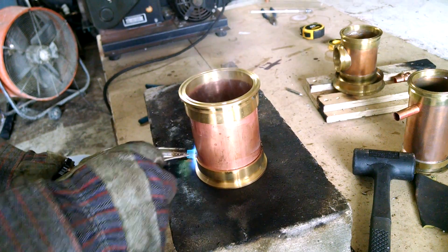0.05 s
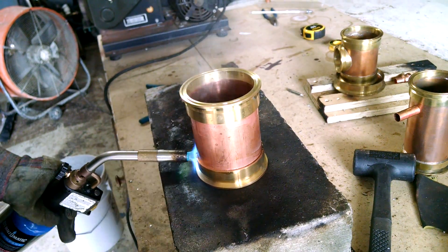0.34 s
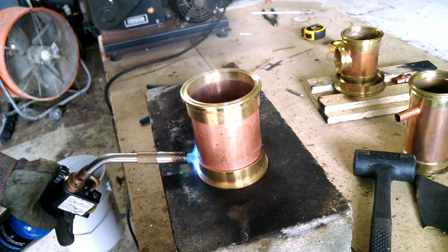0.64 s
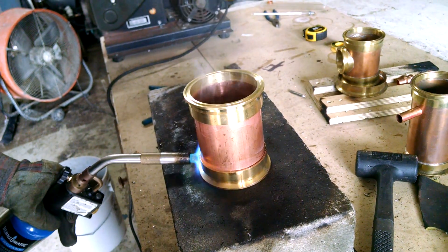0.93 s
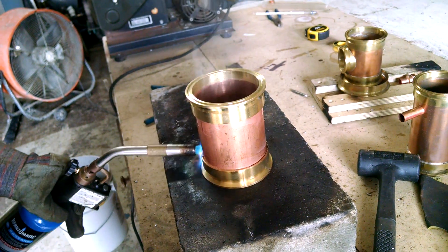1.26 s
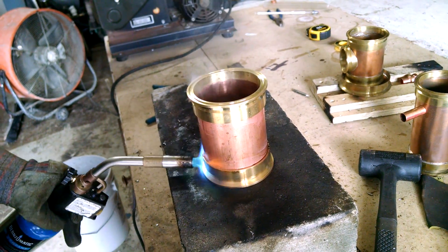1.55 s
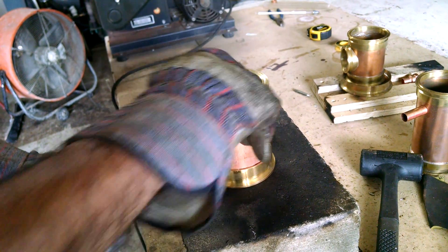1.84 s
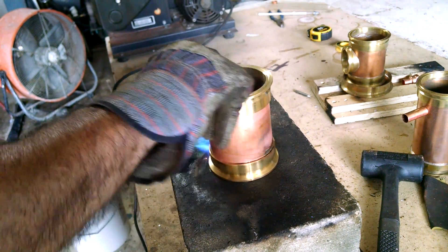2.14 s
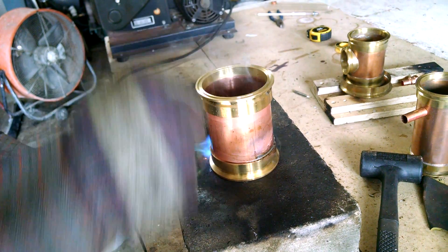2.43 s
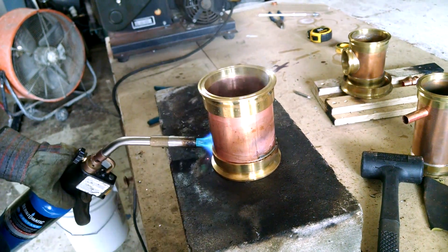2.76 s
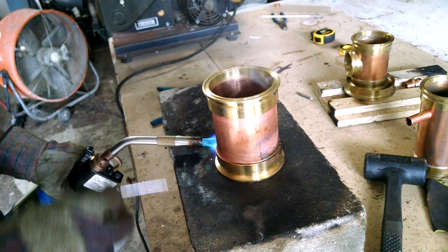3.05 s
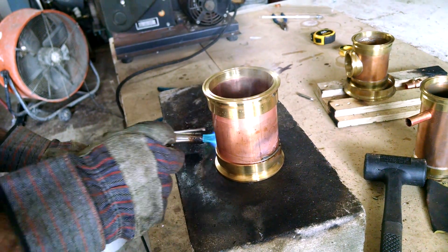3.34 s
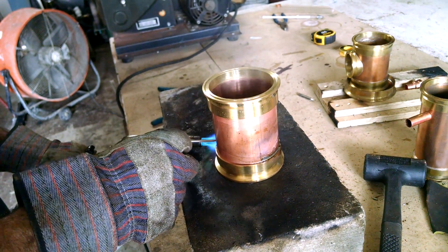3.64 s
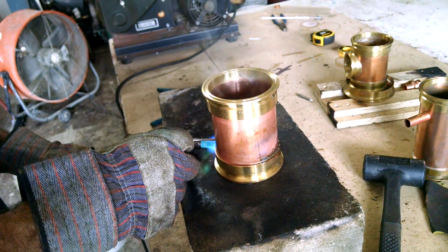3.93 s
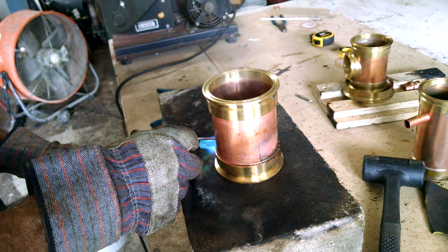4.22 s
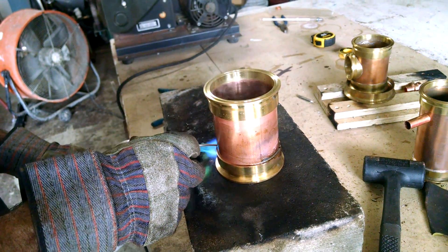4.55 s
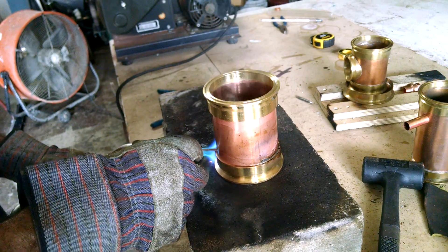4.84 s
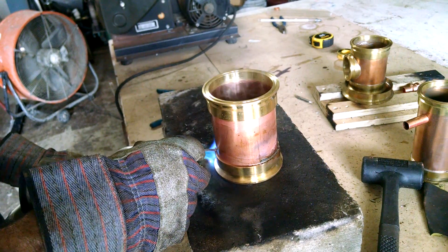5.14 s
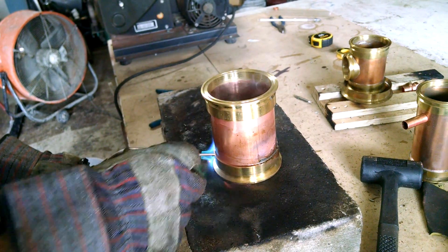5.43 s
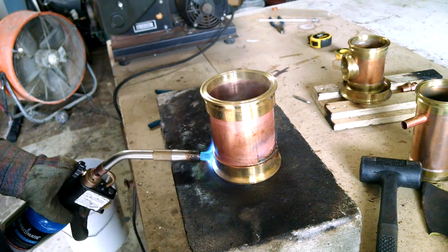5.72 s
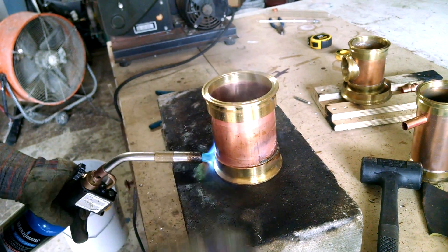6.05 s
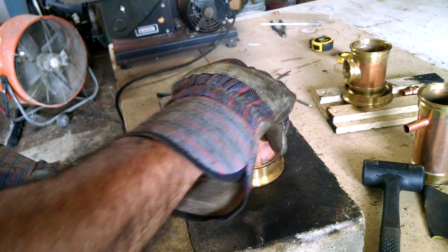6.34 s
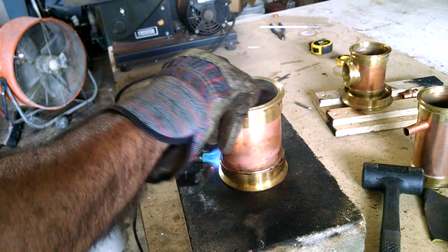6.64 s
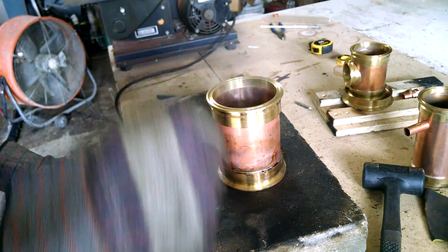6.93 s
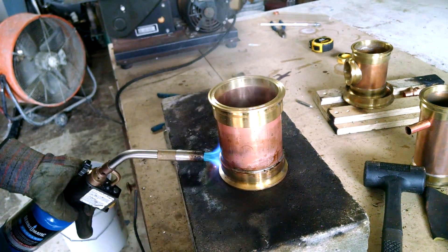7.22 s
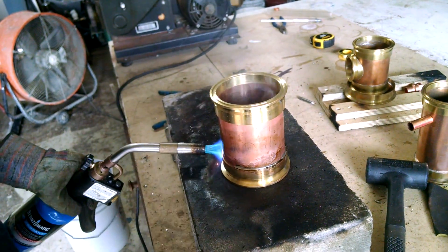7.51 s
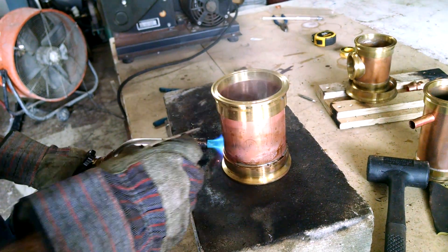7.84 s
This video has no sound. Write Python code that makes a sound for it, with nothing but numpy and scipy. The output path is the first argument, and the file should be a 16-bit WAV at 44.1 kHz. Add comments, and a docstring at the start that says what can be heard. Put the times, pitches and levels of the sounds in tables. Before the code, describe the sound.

A hand-held gas torch roars and hisses steadily against a copper pipe, close up, with a faint motor hum behind.

```python
"""Gas torch at a workshop bench

Close up, a hand-held torch burns against a copper pipe joint; a motor hums behind it, off to the right.
The turbulent flame roars and flutters, and the gas jet hisses as it is played over the metal.
A gloved hand works close by and shades it. Echoes off the bench colour the roar,
and two spaced microphone ports pick it all up."""
import sys
import numpy as np
from scipy import signal
from scipy.fft import rfft, irfft
from scipy.io import wavfile
from scipy.ndimage import uniform_filter1d

SR = 44100
rng = np.random.default_rng(int(sys.argv[2]) if len(sys.argv) > 2 else 0)


def waveform_to_disk(signal):
    """Save audio, clipped to [-1, 1], as 16-bit WAV at the path in sys.argv[1]."""
    frames = np.transpose(np.atleast_2d(signal))
    scaled = np.clip(frames, -1, 1) * 32767
    samples = np.round(scaled).astype(np.int16)
    wavfile.write(sys.argv[1], SR, samples)


N = 347508
TIME = np.arange(N) / SR
FREQ = np.arange(N // 2 + 1) * SR / N


def undb(db):
    """Decibels to gain."""
    return 10 ** (np.asarray(db) / 20)


def curve(table):
    """A table's values, joined by straight lines in time."""
    return np.interp(TIME, *np.transpose(table))


def across(table):
    """A table's columns, joined by straight lines in log frequency."""
    hz, *columns = np.transpose(table)
    return [np.interp(np.log(FREQ + 1), np.log(hz), column) for column in columns]


def bell(hz, width_hz):
    """A rounded bump of height 1 in frequency."""
    return np.exp(-(2 * (FREQ - hz) / width_hz) ** 2)


def colour(outline, peaks):
    """A spectrum in dB: a broad outline with peaks and notches on it."""
    return across(outline)[0] + sum(db * bell(hz, width) for hz, width, db in peaks)


def lift(x, hz, width_hz, db):
    """Raise or lower one band of a sound by a changing number of dB."""
    return x + (undb(db) - 1) * irfft(rfft(x) * bell(hz, width_hz), N)


def drift(rate_hz):
    """A smooth random wobble of spread 1 that moves about rate_hz times a second."""
    wobble = irfft(rfft(rng.standard_normal(N)) * np.exp(-(FREQ / rate_hz) ** 2), N)
    return wobble / wobble.std()


def steady(x, seconds, share=0.38):
    """Even out a share of the short-term swings in a noise's power."""
    power = uniform_filter1d(np.mean(x ** 2, axis=0), int(seconds * SR))
    return x * power ** (-share / 2)


# The torch as it reaches the two microphone ports. Each row: frequency in Hz, left minus right in dB,
# coherence from 0 to 1, phase by which the left leads in radians.
MIC_PORTS = [(60, -9.5, 0.8, 1.43), (130, -6.5, 0.95, 1.04), (260, 0.1, 0.98, 1.08),
             (400, 3.1, 0.83, -0.18), (540, -4.4, 0.94, 0.48), (700, 0.5, 0.98, 0.27),
             (1200, 0.8, 0.99, 0.03), (1900, -4.4, 0.87, -0.52), (2150, -3.2, 0.5, -1.35),
             (2500, -4.1, 0.97, -3.32), (2950, -0.3, 0.89, -3.96), (3300, 2.4, 0.73, -5.09),
             (3600, -1.0, 0.71, -5.7), (4200, -0.7, 0.32, -4.89), (4680, -0.3, 0.42, -3.9),
             (4950, -0.2, 0.86, -3.2), (5350, 0.6, 0.57, -3.7), (5700, 2.0, 0.41, -4.4),
             (6030, 0.4, 0.49, -5.8), (6550, -1.2, 0.66, -6.15), (6820, -1.3, 0.6, -6.4),
             (7050, -1.5, 0.1, -8.9), (7700, -1.2, 0.82, -9.9), (8600, 2.2, 0.45, -10.67),
             (9300, -2.2, 0.62, -12.8), (9700, -1.5, 0.42, -15.0), (10350, 0.4, 0.93, -15.71),
             (11000, -0.5, 0.5, -16.8), (11550, -1.1, 0.58, -18.9), (12300, -1.1, 0.48, -20.9),
             (12800, -1.1, 0.8, -21.95), (14000, -0.8, 0.8, -25.18), (15100, -0.1, 0.85, -28.3)]

def turbulence(colour_db, low_hz, high_hz):
    """One band of eddy noise at the two ports, rms 1: shared direct sound plus the room's diffuse part."""
    balance_db, coherence, phase = across(MIC_PORTS)
    direct, room = rfft(rng.standard_normal((2, N)))
    side = np.array([[1], [-1]])
    pair = np.sqrt(1 + coherence) * direct + side * np.sqrt(1 - coherence) * room
    pair = pair * undb(side * balance_db / 2) * np.exp(0.5j * side * phase)
    hz = FREQ + 1
    band = ((1 + (low_hz / hz) ** 40) * (1 + (hz / high_hz) ** 40)) ** -0.5
    noise = irfft(pair * band * undb(colour_db), N)
    return noise / noise.std()


# The motor, behind the torch. Each row: frequency in Hz, level in dB before panning.
MOTOR_TONES = [(58.3, -69), (118.9, -49.5), (177.2, -49.5)]

def motor(waver_db=2.5, pan_db=-5):
    """A motor off to the right hums on three low, slightly wavering tones."""
    hum = np.zeros(N)
    for hz, db in MOTOR_TONES:
        amplitude = np.sqrt(2) * undb(db + waver_db * drift(3.6))
        hum += amplitude * np.sin(2 * np.pi * hz * TIME + 0.5 * drift(1.5))
    return hum * undb(np.array([[pan_db], [-pan_db]]) / 2)


# When the gloved hand shades or colours the torch. Each row: start in seconds, end in seconds.
HAND_BESIDE = [(-.5, .2), (3.4, 4.95), (7.8, 8.5)]  # shading from beside the nozzle, between it and the microphone
HAND_OVER = [(1.8, 2.61), (6.27, 6.86)]  # reaching over the pipe

def glove(beside_db=0, over_db=0):
    """The dB the glove adds from its two places, fading evenly as the hand moves in and out."""
    change_db = np.zeros(N)
    for visits, move_s, db in [(HAND_BESIDE, 0.62, beside_db), (HAND_OVER, 0.12, over_db)]:
        for arrives, leaves in visits:
            moved_in = np.clip((TIME - arrives) / move_s + 0.5, 0, 1)
            still_there = np.clip((leaves - TIME) / move_s + 0.5, 0, 1)
            change_db += db * moved_in * still_there
    return change_db


# The echo off the glove, just above the pipe. Each row: frequency in Hz, width in Hz, gain in dB.
GLOVE_PEAKS = [(1260, 360, 1), (2220, 180, 5.5), (2410, 150, -7), (3660, 240, 3), (4460, 230, 2)]

def glove_echo(torch):
    """While it is over the pipe, the glove throws the sound back and makes it hollow."""
    return torch + sum(lift(torch, hz, width, glove(over_db=db)) - torch for hz, width, db in GLOVE_PEAKS)


# The jet's tone from close by. Each row: frequency in Hz, relative level in dB.
JET_OUTLINE = [(2300, -19.5), (2600, 2), (2850, -5), (3150, -9), (3500, -13.5), (3900, -20), (5600, -24),
               (7200, -17.5), (7700, -15.5), (8500, -12), (10300, -18.5), (11800, -16), (13200, -17.5),
               (15500, -17)]
# Resonances and gaps of the nozzle and open pipe. Each row: frequency in Hz, width in Hz, gain in dB.
NOZZLE_PEAKS = [(2430, 100, 6.5), (2786, 180, 6), (2950, 60, 9), (2980, 66, -2), (3058, 52, 3.5),
                (3500, 69, 2), (3640, 180, -3.5), (4260, 810, 1.4), (5550, 480, 4.5), (5940, 300, -1),
                (7700, 320, 8.3), (9840, 700, -2), (12100, 800, -1), (13200, 600, 3)]
# The jet hisses more the harder it strikes the metal. Each row: time in seconds, base level in dB.
JET_STRIKE = [(0.0, -31), (0.14, -34), (0.22, -31), (0.32, -31.5), (0.58, -30.5), (0.82, -32),
              (1.13, -30.5), (1.33, -34.5), (1.51, -28), (2.01, -30.5), (2.31, -31), (2.47, -34),
              (2.77, -32.5), (3.48, -36.5), (3.7, -34.5), (3.8, -35.5), (4.14, -32), (4.46, -34),
              (4.62, -33), (4.93, -31), (5.03, -29), (5.13, -31), (5.55, -29.5), (5.65, -33), (5.87, -28),
              (6.15, -28.5), (6.21, -30), (6.79, -26), (6.87, -30), (7.2, -30.5), (7.32, -28), (7.54, -32),
              (7.82, -29), (7.88, -34)]
# The jet's bands, low to high. Each row: time in seconds, dB added to the base level.
RUSH_DB = [(0.0, 11.5), (0.4, 11.5), (0.85, 13), (1.37, 11.5), (1.5, 11), (1.72, 11.5), (1.9, 9),
           (2.17, 7.5), (2.28, 12.5), (2.7, 10.5), (3.4, 14.5), (4.0, 13), (4.26, 14.5), (5.1, 8.5),
           (5.89, 11.5), (6.15, 12.5), (6.26, 10.5), (6.34, 12), (6.55, 10.5), (7.0, 12.5), (7.08, 11),
           (7.4, 10), (7.88, 12)]
LOW_HISS_DB = [(0.0, 3.5), (0.99, 2.7), (1.37, -1.2), (1.45, 2), (1.85, -1), (2.4, 1), (2.47, 4.3),
               (2.93, 0.6), (3.5, 4.3), (3.9, 5.8), (4.6, 3.3), (5.1, 2.3), (5.97, 1.3), (6.75, 1.2),
               (7.4, -0.7), (7.88, 2)]
HIGH_HISS_DB = [(0.0, 0.7), (1.31, 2.8), (1.81, -1.2), (2.6, 3.8), (3.05, 4.6), (3.6, 1.5), (4.65, 1),
                (5.35, -1.3), (6.4, -0.6), (6.79, -2.3), (7.14, 1.3), (7.88, -0.5)]
SPRAY_DB = [(0.0, 1.5), (2.41, -2.5), (2.47, -3), (3.36, 3.5), (4.18, 0.5), (5.09, 2), (5.31, -1),
            (7.74, -4), (7.88, -2)]
SIZZLE_DB = [(0.0, 6), (0.42, -1), (0.62, 5), (1.03, 0), (1.7, -0.5), (2.0, 0), (2.4, 5.5), (2.79, 2),
             (3.12, 9.5), (3.5, 9), (3.82, 2), (4.4, 2.5), (4.84, 1.5), (5.05, 5), (5.15, -2), (5.22, 2.5),
             (5.38, -2.5), (5.49, 4), (6.25, -3), (6.35, 4), (6.59, -1), (6.85, 3), (7.06, -0.5),
             (7.88, 2.5)]
# The top of the rush, which the glove cancels beside the nozzle and throws back over the pipe.
# Each row: time in seconds, relative lift in dB.
RUSH_LIFT = [(0, 3.5), (1.5, 4), (1.78, 7.5), (2.0, 5.5), (2.7, 2.3), (3.1, 0), (3.5, 5), (4.0, -2),
             (4.65, -1.5), (5.3, -1), (5.7, 4), (6.15, 5.5), (6.3, -0.5), (6.34, 10), (6.7, 8.5),
             (6.9, 3.5), (7.88, 3)]

def gas_jet(flutter_db=0.64, flicker_db=0.96, waver_db=1.12, sizzle_db=1.3, rush_follow=0.64):
    """Gas rushes from the nozzle and hisses where it strikes the hot metal; the glove shades it all."""
    strike_db = curve(JET_STRIKE)
    swell_db = strike_db - strike_db.mean()
    colour_db = colour(JET_OUTLINE, NOZZLE_PEAKS)
    rush = lift(turbulence(colour_db, 2250, 3670), hz=3380, width_hz=520, db=curve(RUSH_LIFT))
    rush = steady(rush, seconds=0.51, share=0.71)
    rush *= undb(curve(RUSH_DB) + rush_follow * swell_db + flicker_db * drift(26))
    low = undb(curve(LOW_HISS_DB) + waver_db * drift(6)) * turbulence(colour_db, 3480, 6590)
    high = undb(curve(HIGH_HISS_DB) + waver_db * drift(6)) * turbulence(colour_db, 6350, 10050)
    spray = undb(curve(SPRAY_DB) + flicker_db * drift(46)) * turbulence(colour_db, 9700, 13500)
    sizzle_gain = undb(curve(SIZZLE_DB) + sizzle_db * drift(250) + waver_db * drift(6))
    sizzle = sizzle_gain * turbulence(colour_db, 13200, 15000)
    hiss = undb(swell_db) * (low + high + spray + sizzle)
    shade_db = glove(beside_db=-3.1, over_db=-2.2)
    return undb(strike_db.mean() + shade_db + flutter_db * drift(32)) * (rush + hiss)


# Passing resonances at the joint. Each row: frequency in Hz, width in Hz.
LICK_BANDS = [(560, 52), (660, 82), (810, 57), (910, 69), (1020, 43), (1140, 26)]

def licks(roar, depth_db=1.9, rate_hz=3.5):
    """The roar's resonances come and go by chance as the flame licks round the pipe."""
    return roar + sum(lift(roar, hz, width, depth_db * drift(rate_hz)) - roar for hz, width in LICK_BANDS)


# The pitch of the roar's hollow note wanders up and down. Each row: time in seconds, pitch in Hz.
HOLLOW_PITCH = [(0.0, 636), (0.44, 625), (1.49, 644), (2.17, 585), (2.65, 633), (3.36, 553), (3.9, 586),
                (4.3, 631), (4.52, 667), (4.78, 623), (5.4, 694), (6.14, 655), (6.54, 614), (7.09, 660),
                (7.88, 637)]

def hollow_note(roar, width_hz=70, peak_db=6):
    """The air pocket between nozzle, pipe and glove gives the roar a hollow note; rms 1."""
    carrier = np.exp(2j * np.pi * np.cumsum(curve(HOLLOW_PITCH)) / SR)
    lowpass = signal.butter(1, width_hz / 2, fs=SR)
    # Shift the note down to 0 Hz, keep what is near it, and shift it back.
    note = 2 * np.real(carrier * signal.filtfilt(*lowpass, roar / carrier, padtype=None))
    closing_db = glove(beside_db=4)  # the glove closes the pocket and sharpens its note
    hollow = roar + (undb(peak_db + closing_db) - 1) * note
    return hollow / hollow.std()


# The copper pipe's two rings. Each row: time in seconds, relative lift in dB.
LOW_RING_LIFT = [(0, -4), (.3, 4), (1.1, 2.5), (1.3, 0), (2.1, -2), (2.3, 3.5), (2.55, -0.5), (5.1, -1.5),
                 (5.5, 2.5), (5.9, -1.5), (7.88, -1)]
HIGH_RING_LIFT = [(0, 2), (1.2, 1.5), (1.5, -2.5), (4.0, -1), (4.6, -2.5), (5.1, 2), (5.35, 7.5),
                  (5.7, 0.5), (6.3, 2.5), (6.7, -1), (7.88, -1)]

def pipe_ring(roar):
    """The pipe rings in two bands within the roar."""
    roar = lift(roar, hz=850, width_hz=350, db=curve(LOW_RING_LIFT))
    return lift(roar, hz=1150, width_hz=120, db=curve(HIGH_RING_LIFT))


# Short puffs at the joint. Each row: time of the peak in seconds, boost in dB.
FLAME_PUFFS = [(4.44, 0), (4.596, 1.5), (4.796, 6), (4.885, 3), (5.042, 4.5), (5.152, 3), (5.234, 4),
               (7.08, 0)]

def puffs(rise_s=0.027):
    """The dB the roar briefly gains as the flame laps round the pipe."""
    return sum(db * np.exp(-((TIME - peak_s) / rise_s) ** 2) for peak_s, db in FLAME_PUFFS)


# The flame's tone from close by. Each row: frequency in Hz, relative level in dB.
FLAME_OUTLINE = [(25.0, -42), (50.0, -30), (62.0, -26.5), (105.0, -25), (130, -19.5), (175.0, -13),
                 (250.0, -9.5), (370.0, -17.5), (480.0, -12), (540.0, -5.5), (640.0, -2.5), (850.0, -2),
                 (1300.0, -5.5), (1900.0, -12), (2300.0, -12.5)]
# Peaks and notches at the microphone from echoes off bench, pipe and walls.
# Each row: frequency in Hz, width in Hz, gain in dB.
BENCH_ECHOES = [(179.3, 7.3, 7.5), (285, 10, 4.5), (282, 8.5, -6.5), (303.5, 13, 2.5), (452.5, 14, 3),
                (477, 17, -12), (500, 12, -4), (520, 18, 4.5), (572.5, 8.6, -14), (589, 22, 3),
                (604.4, 15, -4), (617, 33, -0.5), (738, 37, -4.5), (792, 21, 5.5), (806, 20, -1.5),
                (853, 12, 1), (898, 16, 0), (934, 24, -1.5), (1016, 24, 4), (1083, 23, -5), (1126, 24, 3),
                (1277, 26, -5.5), (1342, 26, -1.5), (1410, 20, 2), (1427, 32, -9), (1486, 31, 3.5),
                (1547, 72, -6.5), (1670, 29, 2), (1890, 48, 3.5), (2183, 77, -7.5)]
# The flame swells and sinks as it is played over the joint. Each row: time in seconds, base level in dB.
RUMBLE_DB = [(0.0, -25), (0.08, -30), (0.24, -27.5), (0.42, -31.5), (2.01, -29.5), (2.09, -27),
             (2.29, -28.0), (4.28, -27.5), (4.38, -30.9), (4.6, -26.8), (4.8, -28), (7.18, -29.5),
             (7.88, -27)]
POCKET_DB = [(0.0, -22.5), (0.48, -26.5), (0.9, -27), (1.27, -23), (1.47, -29.5), (2.13, -22.5),
             (2.57, -24.5), (2.75, -20.5), (2.87, -25.5), (3.46, -21.5), (3.57, -26.5), (3.85, -22.5),
             (4.3, -24.5), (4.5, -20), (4.6, -17.5), (4.7, -21), (5.05, -22.5), (5.2, -22.5), (5.5, -24),
             (5.87, -23), (6.2, -28), (6.4, -26), (7.05, -23.5), (7.3, -22), (7.88, -23)]
CORE_DB = [(0.0, -20), (0.56, -19), (0.84, -20.5), (0.9, -20), (1.37, -21.5), (1.47, -18.5), (1.67, -21.5),
           (1.85, -19), (2.05, -20.0), (2.31, -17.5), (2.47, -22), (3.05, -19), (3.58, -21.5),
           (3.68, -17.1), (3.84, -21.5), (4.24, -18), (4.44, -21), (4.74, -23.5), (4.93, -22.5),
           (5.11, -23), (5.26, -25), (5.33, -20.5), (5.53, -18.5), (5.61, -24.5), (5.83, -19),
           (6.23, -21.5), (6.49, -19), (6.55, -20.5), (6.79, -17.5), (6.85, -22.5), (7.1, -19.5),
           (7.56, -22.5), (7.62, -21), (7.88, -22)]
SMALL_EDDY_DB = [(0.0, -22.5), (0.62, -23), (1.17, -21.5), (2.27, -22.5), (3.24, -23), (5.57, -21),
                 (5.65, -25.5), (5.97, -20.5), (6.33, -24.5), (7.5, -23.5), (7.6, -25.5), (7.88, -19.5)]

def flame(flutter_db=0.6, flutter_hz=27, surge_db=0.5, surge_hz=6):
    """Eddies of burning gas in four sizes swell and flutter together; the pocket and core also puff."""
    core_db = curve(CORE_DB)
    swell_db = core_db - core_db.mean()
    rumble_db = curve(RUMBLE_DB) + 0.71 * swell_db
    pocket_db = curve(POCKET_DB) + swell_db + surge_db * drift(surge_hz)
    small_db = curve(SMALL_EDDY_DB) + 0.33 * swell_db + surge_db * drift(surge_hz)
    small_db += glove(beside_db=-0.5, over_db=-3.5)
    colour_db = colour(FLAME_OUTLINE, BENCH_ECHOES)
    rumble = undb(rumble_db) * steady(turbulence(colour_db, 18, 497), seconds=0.39)
    pocket = hollow_note(licks(turbulence(colour_db, 506, 703)))
    pocket = undb(pocket_db + puffs()) * steady(pocket, seconds=0.1)
    core = pipe_ring(licks(turbulence(colour_db, 746, 1564)))
    core = undb(core_db + puffs()) * steady(core, seconds=0.09)
    small_eddies = undb(small_db) * steady(turbulence(colour_db, 1489, 2266), seconds=0.13)
    return undb(flutter_db * drift(flutter_hz)) * (rumble + pocket + core + small_eddies)


def scene():
    """Flame and jet close to the microphone, the motor behind them."""
    return glove_echo(flame() + gas_jet()) + motor()


def record(dry):
    """A soft limiter rounds the loudest peaks, and the top treble is cut steeply."""
    top_hz = 15500
    rounded = dry / (1 + dry ** 8) ** (1 / 8)
    return irfft(rfft(rounded) / np.sqrt(1 + (FREQ / top_hz) ** 600), N)


dry = scene()
out = record(dry)
waveform_to_disk(out)
```